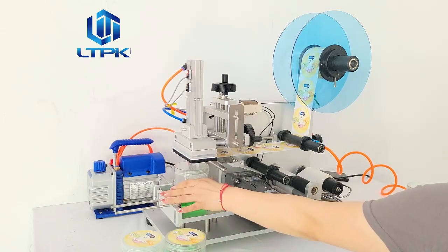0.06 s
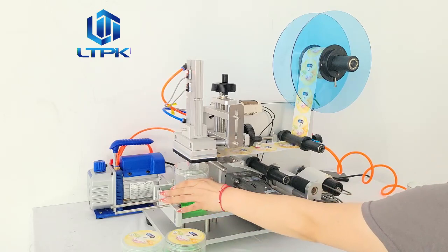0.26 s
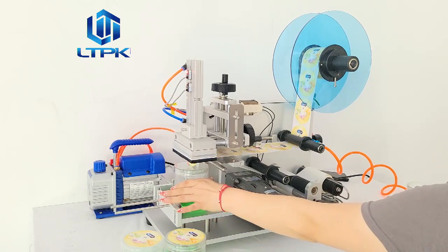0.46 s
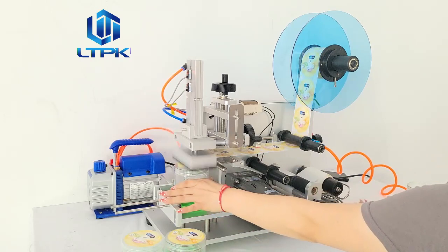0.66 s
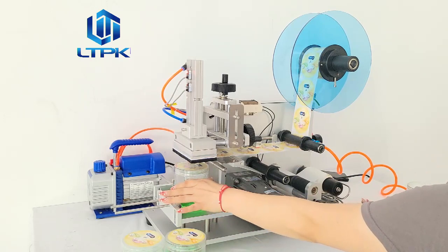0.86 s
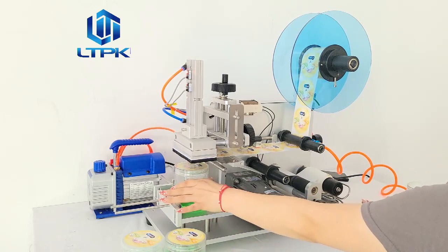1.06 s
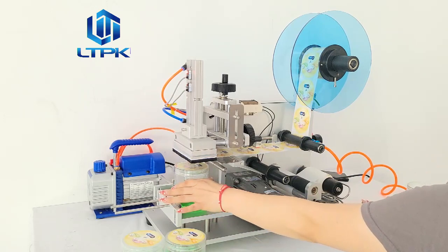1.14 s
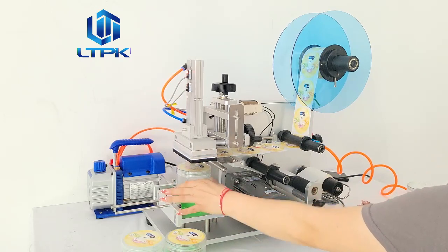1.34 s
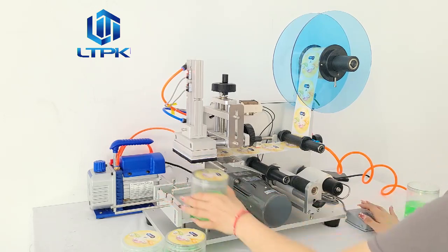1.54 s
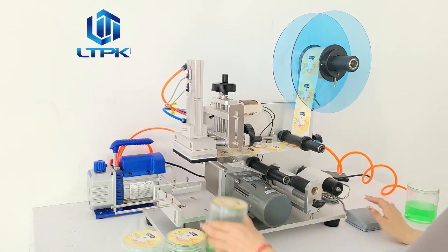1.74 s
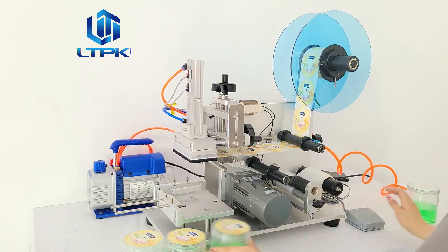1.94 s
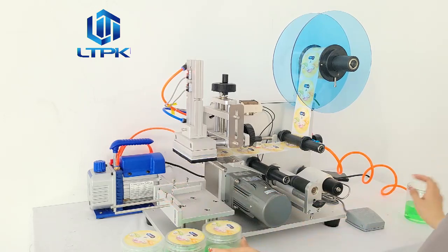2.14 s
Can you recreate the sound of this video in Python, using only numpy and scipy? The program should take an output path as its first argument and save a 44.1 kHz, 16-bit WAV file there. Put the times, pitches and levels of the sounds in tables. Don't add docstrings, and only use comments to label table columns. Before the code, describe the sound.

A compressed-air jet dominates: faint rapid pump ticking, a tiny valve squeak at 0.15 s, then a hard knock at 0.23 and bright, smooth, wide hiss until 0.82. The sliding head clacks metallically at 0.86-0.89 and 0.97, with short room ring and thin leaking air. Background is suppressed almost to silence from 1.4; a jar drags barely audibly, then bumps dully onto the table at 2.04-2.15 as pump noise returns.

```python
import sys
import numpy as np
from scipy import signal
from scipy.fft import rfft, irfft
from scipy.io import wavfile

SR = 44100
rng = np.random.default_rng(int(sys.argv[2]) if len(sys.argv) > 2 else 0)


def invert_db(x):
    u = np.asarray(x, float) / 20
    return 10 ** u


def put_to_file(sound):
    columns = np.atleast_2d(sound).T
    safe = np.clip(columns, -1, 1)
    whole_steps = np.round(safe * 32767)
    wavfile.write(sys.argv[1], SR, whole_steps.astype(np.int16))


N = 97020
T = np.arange(N) / SR


def rms_one(x):
    return x / np.sqrt(np.mean(x ** 2) + 1e-20)


def in_time(rows):
    s, db = np.transpose(rows)
    return invert_db(np.interp(T, s, db))


def at_hz(points, hz):
    f, value = np.array(points)[:, 0], np.array(points)[:, 1]
    return np.interp(np.log(hz + 1), np.log(f), value)


def drift(rate):
    step = 40
    r = np.exp(-2 * np.pi * rate * step / SR)
    noise = rng.standard_normal(N // step + 2002)
    slow = signal.lfilter([1], [1, -2 * r, r * r], noise)[2000:]
    return np.interp(np.arange(N) / step, np.arange(len(slow)), rms_one(slow))


def coloured(spectrum):
    gain = invert_db(at_hz(spectrum, np.fft.rfftfreq(N, 1 / SR)))
    return rms_one(irfft(rfft(rng.standard_normal(N)) * gain, N))


def swell(s, length):
    u = np.maximum(T - s, 0) / (.5 * length)
    return u * np.exp(1 - u)


def ring(x, hz, t60):
    r, w = invert_db(-60 / (t60 * SR)), 2 * np.pi * hz / SR
    return signal.lfilter([.5, 0, -.5], [1, -2 * r * np.cos(w), r * r], x + 1e-18)


def noise_ring(hz, t60):
    return rms_one(ring(rng.standard_normal(N), hz, t60))


def struck(modes, hits, thud_db, reach_db=22, rattle=1):
    shapes = np.array([swell(h[0], h[2]) for h in hits])
    strength, length, favoured = np.array([h[1:4] for h in hits]).T
    out = np.zeros(N)
    for db, hz, shape in zip(strength, favoured, shapes):
        blur_s = 2.85 / hz
        knock = rms_one(ring(ring(rng.standard_normal(N), hz, blur_s), hz, blur_s))
        out += invert_db(db + thud_db) * shape * knock
    for hz, db, t60 in modes:
        loss_db = reach_db * np.log2(hz / favoured) ** 2
        force = (invert_db(strength - loss_db) / (length * SR)) @ shapes
        tone = np.sin(2 * np.pi * hz * T + 1.65 * rattle * drift(43))
        grain = noise_ring(hz, 6.8 / hz + 0.0074)
        out += invert_db(db) * ring(force * (tone + rattle * grain), hz, t60)
    return out


# (t/s, level/dB)
BACKGROUND = [
    (0, -47),
    (.2, -45.5),
    (.8, -49),
    (1.1, -52),
    (1.43, -60),
    (2.03, -60),
    (2.075, -49.5),
    (2.2, -49.5),
]
# (f/Hz, level/dB per Hz)
WHIRR_COLOUR = [(59, -62.5), (100, -31.5), (415, -32), (801, -12), (1150, -12.5), (2080, -4.5), (8110, -18),
                (11000, -3.5), (13500, -4), (15300, -7.5), (16000, -27)]
# (f/Hz, level/dB per Hz)
PUFF_COLOUR = [(6000, -28), (9000, -15), (11000, -13), (13500, 3.5), (15200, 4), (16000, -16)]
# (f/Hz, level/dB, t60/s)
CASING = [(2108, -15.5, 0.04), (2630, -18, 0.011), (2970, -20, 0.075), (3260, -30.5, 0.016),
          (7940, -32, 0.0114)]
# (t/s, level/dB)
HUM = [(0, -83), (.08, -72.5), (.16, -93), (.3, -67), (.9, -61), (.96, -69), (.99, -50.5), (1.1, -62),
       (1.18, -94.5), (1.77, -101), (1.8, -76), (1.86, -104), (2.03, -94), (2.08, -44), (2.2, -61.5)]


def pump():
    turn_s, first_puff_s, puff_s = .04191, .0315, .0036
    weak_puff_db, weak_tick_db, scatter_db = -5.5, 5, 1.0
    tail_s, tail_db = 0.0073, -2
    hum_hz = 101.7
    puffs, knocks = np.zeros(N), np.zeros(N)
    count = int(2 * N / SR / turn_s) + 2
    for k, (puff_luck, late, tick_luck) in enumerate(rng.standard_normal((count, 3))):
        shape = swell(first_puff_s + (k - 2) * turn_s / 2 + 0.00013 * late, puff_s)
        puffs += invert_db(weak_puff_db * (k % 2) + scatter_db * puff_luck) * shape
        knocks += invert_db(weak_tick_db * (k % 2) + scatter_db * tick_luck) * shape ** 2
    fade = np.exp(-1 / (tail_s * SR))
    puffs = puffs + invert_db(tail_db) * signal.lfilter([1 - fade], [1, -fade], puffs)
    ticks = np.zeros(N)
    for hz, db, t60 in CASING:
        tone = knocks * np.sin(2 * np.pi * hz * T + drift(40))
        scrape = (knocks + .25) * 3 * rng.standard_normal(N)
        ticks += invert_db(db) * rms_one(ring(tone + scrape, hz, t60))
    whirr = invert_db(-7 + 1.5 * drift(60)) * coloured(WHIRR_COLOUR)
    hum = np.sin(2 * np.pi * hum_hz * T) * invert_db(2.5 * drift(12)) * in_time(HUM)
    return in_time(BACKGROUND) * (rms_one(puffs) * coloured(PUFF_COLOUR) + ticks + whirr) + hum


# (f/Hz, level/dB, t60/s)
PILOT = [(960, -6, 0.045), (1095, 9, 0.0083)]
# (t/s, level/dB, length/s, favoured f/Hz)
PILOT_HITS = [
    (0.14, -39.5, 0.0034, 1050),
    (0.148, -29.5, .006, 1095),
    (.155, -28.5, 0.0069, 1095),
    (.172, -42.5, .015, 1020),
    (.192, -41, 0.0069, 1000),
]


def pilot_valve():
    return struck(PILOT, PILOT_HITS, -30, reach_db=70, rattle=.3)


# (t/s, level/dB)
JET = [
    (.218, -60),
    (.228, -30),
    (.237, -15),
    (.246, -15.5),
    (.262, -10),
    (.813, -9.7),
    (.826, -17),
    (.845, -28),
    (.95, -58),
    (1.1, -95),
]
# (f/Hz, level/dB per Hz)
JET_COLOUR = [(1470, -71), (2500, -38.5), (3180, -23.5), (4580, -36.5), (6500, -20.5), (7420, -19.5),
              (13000, 8), (14900, 8), (15700, -1.5), (16000, -18.5)]
# (f/Hz, level/dB per Hz)
FLUTTER_COLOUR = [(18, -53.5), (30, -34), (93, -15), (624, -8), (697, 1.5), (809, -2.5), (1050, 0.5),
                  (1520, 5), (2500, -28.5), (3250, -63), (5500, -120)]
# (f/Hz, level/dB, t60/s)
FRAME = [(1044, -39, 0.075), (1400, -43, 0.021), (1480, -39, .08), (1687, -43, 0.027)]
# (f/Hz, level/dB, t60/s)
NOZZLE = [(9800, -19, 0.0047), (11040, -17, 0.0092), (13190, -11, 0.0059), (14515, -13, 0.0031)]


def jet():
    flow = in_time(JET) * (T > JET[0][0])
    hiss = invert_db(.5 * drift(25)) * coloured(JET_COLOUR)
    flutter = invert_db(-34.5 + 2.0 * drift(2.7)) * coloured(FLUTTER_COLOUR)
    frame = sum(invert_db(db) * noise_ring(hz, t60) for hz, db, t60 in FRAME)
    nozzle = sum(invert_db(db + 4 * drift(12)) * noise_ring(hz, t60) for hz, db, t60 in NOZZLE)
    return flow * (hiss + flutter + frame + nozzle)


# (t/s, level/dB)
SIDE_HISS = [
    (.22, -47),
    (.26, -26),
    (.3, -38),
    (.35, -76),
    (.45, -61),
    (.5, -36.5),
    (.68, -40.5),
    (.73, -63),
    (.88, -62.5),
]
# (f/Hz, level/dB per Hz)
SIDE_COLOUR = [(3500, -56.5), (4500, 1.5), (7500, 5), (11000, 3.5), (15000, -5)]


def side_hiss():
    blowing = (T > SIDE_HISS[0][0]) * (T < 1.04)
    return in_time(SIDE_HISS) * blowing * coloured(SIDE_COLOUR)


# (t/s, level/dB)
EXHAUST = [
    (.225, -68),
    (.24, -40),
    (.28, -61),
    (.33, -36.5),
    (.6, -41),
    (.8, -33.5),
    (.85, -43),
    (1.0, -46.5),
    (1.25, -52.5),
    (1.4, -100),
]
# (f/Hz, level/dB per Hz)
EXHAUST_COLOUR = [(2400, -33.5), (3200, -4.5), (5000, 0), (8000, -2), (10000, -14), (16000, -33.5)]


def exhaust():
    return in_time(EXHAUST) * (T > JET[0][0]) * coloured(EXHAUST_COLOUR)


# (f/Hz, level/dB, t60/s)
VALVE = [(738, -18.5, 0.31), (980, -6.5, 0.059), (1095, -3, 0.023), (1478, 0, 0.0087), (1610, -5.5, 0.032),
         (1770, -11.5, 0.026), (1843, -9, 0.016), (3028, -0.5, 0.012), (5030, -3, 0.01),
         (5590, -17, 0.03295)]
# (t/s, level/dB, length/s, favoured f/Hz)
VALVE_HITS = [(0.2263, -24.5, 0.0031, 959), (.227, -11, 0.0053, 5093), (0.235, 3, 0.0025, 9870),
              (0.2392, 6, 0.0046, 9800), (0.234, -17.5, 0.0026, 980), (0.2462, -9.5, 0.0019, 1500),
              (0.2518, -8, 0.0018, 1592), (0.2519, -18, 0.00079, 3000), (0.2546, -9.5, 0.00097, 1635),
              (0.2602, -8.5, 0.0059, 1677), (0.264, -11.5, 0.0065, 1542), (0.271, -18, 0.034, 1482)]


def valve():
    return struck(VALVE, VALVE_HITS, -19.5)


# (f/Hz, level/dB, t60/s)
HEAD = [(182.3, -8.5, 0.24), (260, -6.5, 0.25), (380.4, -4.5, 0.073), (727, -3, 0.035), (922.4, -13, 0.038),
        (1073, -12, 0.033), (1247, -4.5, 0.036), (1417.4, 0, 0.025), (1599, -3, 0.046), (1715, -7, 0.041),
        (1877, -7.5, 0.04), (3020, 3, 0.009), (3922, -6.5, 0.004), (5830, 0.5, 0.024)]
# (t/s, level/dB, length/s, favoured f/Hz, air burst level/dB)
HEAD_HITS = [(.772, -32, 0.057, 260, -41), (.773, -25, 0.03, 787, -51.5), (0.777, -29, 0.063, 1670, -44.5),
             (0.8526, -38, 0.0075, 4000, -23.5), (0.8591, -16, 0.0025, 1520, -11.5),
             (0.859, -18, 0.0025, 6200, -43.5), (0.861, -26.5, 0.0023, 1270, -21),
             (0.867, -24, 0.011, 265, -37.5), (0.863, -21.5, 0.036, 800, -22),
             (0.877, -16.5, 0.00052, 1080, -31), (0.8779, -12, 0.00097, 1400, -23.5),
             (.879, -26.5, .004, 500, -45), (0.882, -16, 0.001, 1725, -16),
             (0.8849, -24.5, 0.0036, 1620, -16.5), (0.882, -23, 0.0022, 6340, -38),
             (0.891, -36, 0.021, 107, -41), (0.9686, -7.5, 0.0036, 3600, -13.5),
             (0.9687, -16, 0.0016, 1774, -28.5), (0.973, -16.5, 0.0035, 900, -28),
             (0.969, -20, 0.012, 440, -35), (0.977, -17.5, 0.014, 1400, -34.5), (1.004, -24, .02, 900, -44),
             (1.01, -35, .004, 1600, -48)]
# (f/Hz, level/dB per Hz)
BURST_COLOUR = [(800, -37.5), (2000, -9), (4000, -15.5), (8000, -9.5), (11000, -5.5), (14000, -8),
                (16000, -2.5)]
# (f/Hz, level/dB, t60/s)
PLATE = [(171.5, -51, .5), (254.9, -52, .5), (1296, -59.5, 0.34), (1648.3, -59, 0.99), (1675.6, -54, 0.82),
         (1730, -59, 0.63)]


def head():
    bursts = sum(invert_db(h[4]) * swell(h[0], h[2]) for h in HEAD_HITS)
    clacks = struck(HEAD, HEAD_HITS, -9.5) + bursts * coloured(BURST_COLOUR)
    plate = sum(invert_db(db) * ring(clacks, hz, t60) for hz, db, t60 in PLATE)
    return clacks + plate


# (f/Hz, level/dB, t60/s)
TABLE = [(98, -11.5, 0.095), (271, -2, 0.0705), (330, 7, 0.039), (403.7, -5, 0.0718), (500, 4.5, 0.086),
         (601.3, -1, 0.069), (700, -10, 0.032), (860, 4.5, 0.04)]
# (t/s, level/dB, length/s, favoured f/Hz)
JAR_HITS = [(1.642, -55, .04, 846), (1.665, -52, 0.016, 330), (1.68, -56.5, 0.046, 700),
            (1.76, -52, 0.022, 340), (1.783, -57, 0.013, 330), (2.029, -54, 0.0074, 335),
            (2.043, -29, 0.005, 330), (2.048, -38.5, 0.016, 860), (2.053, -26.5, 0.0019, 330),
            (2.063, -21.5, 0.0025, 319), (2.064, -23.5, 0.031, 98), (2.074, -29, 0.0059, 560),
            (2.088, -24.5, 0.0045, 373), (2.098, -35, 0.006, 393.6), (2.104, -34.5, 0.0075, 540),
            (2.118, -31.5, .012, 470), (2.147, -36.5, 0.0025, 284), (2.155, -42, 0.018, 500),
            (2.171, -49, 0.0067, 330), (2.182, -46, 0.012, 500)]


def jar():
    return struck(TABLE, JAR_HITS, -22, reach_db=70, rattle=.3)


# (f/Hz, t60/s)
ROOM = [(100, 0.39), (400, 0.71), (1500, 0.88), (3000, 0.53), (8000, 0.6), (15000, 0.1)]


def room(x):
    t, tail = np.arange(SR) / SR, np.zeros(SR)
    edges = 60 * 2 ** np.arange(0, 8.6, .5)
    for low, high in zip(edges, edges[1:]):
        sos = signal.butter(2, [low, high], "band", fs=SR, output="sos")
        band = signal.sosfilt(sos, rng.standard_normal(SR))
        t60 = at_hz(ROOM, np.sqrt(low * high))
        tail += band * invert_db(-60 * t / t60) * (t > .006)
    return signal.fftconvolve(x, tail / np.sqrt(np.sum(tail ** 2)))[:N]


# (t/s, level/dB)
CLOSING = [
    (0, -1),
    (1.019, 0),
    (1.023, -3),
    (1.2, -5.5),
    (1.3, -6.5),
    (1.45, -11.5),
    (1.6, 0),
]


def scene():
    valves, air, clacks, bumps = pilot_valve() + valve(), jet() + exhaust(), head(), jar()
    background = in_time(BACKGROUND)
    jar_send = bumps * background / invert_db(BACKGROUND[-1][1])
    wet = room(invert_db(-10) * clacks + invert_db(-22) * valves + invert_db(-15.5) * jar_send + invert_db(-14) * air)
    mid = in_time(CLOSING) * (air + clacks + valves + wet) + bumps + pump()
    side = side_hiss()
    return np.array([mid + side, mid - side])


def roll_off(x):
    return signal.sosfilt(signal.butter(12, 16300, fs=SR, output="sos"), x)


def record(dry):
    low_hz, cutoff_hz, ceiling = 45, 16450, 1.25
    x = signal.sosfilt(signal.butter(2, low_hz, "high", fs=SR, output="sos"), dry)
    x = ceiling * np.tanh(x / ceiling)
    x = signal.sosfilt(signal.cheby2(14, 70, cutoff_hz, fs=SR, output="sos"), x)
    return roll_off(np.clip(x, -1, 1))


dry = scene()
out = record(dry)
put_to_file(out)
```